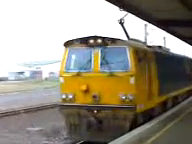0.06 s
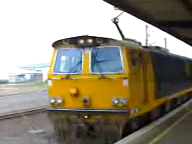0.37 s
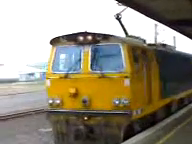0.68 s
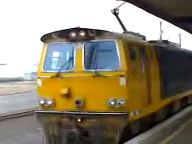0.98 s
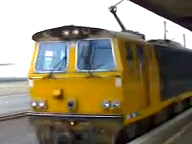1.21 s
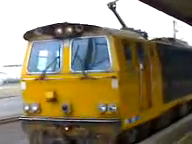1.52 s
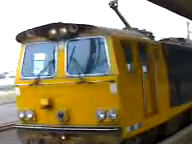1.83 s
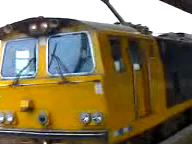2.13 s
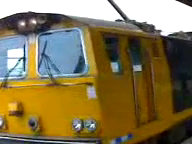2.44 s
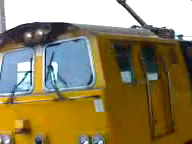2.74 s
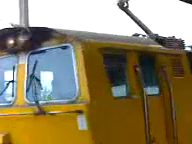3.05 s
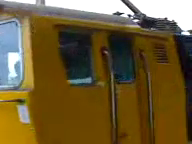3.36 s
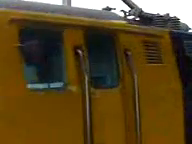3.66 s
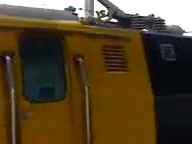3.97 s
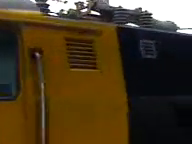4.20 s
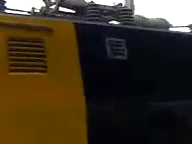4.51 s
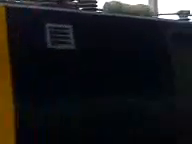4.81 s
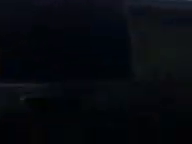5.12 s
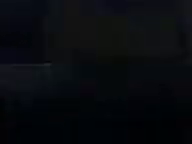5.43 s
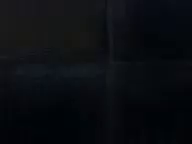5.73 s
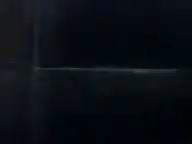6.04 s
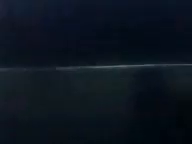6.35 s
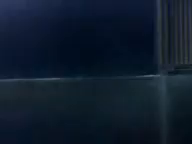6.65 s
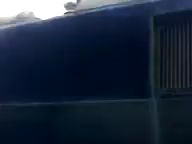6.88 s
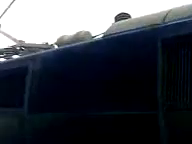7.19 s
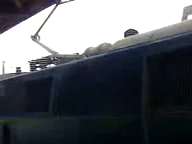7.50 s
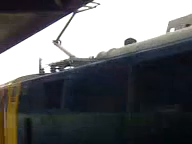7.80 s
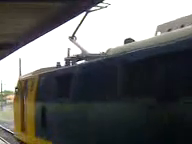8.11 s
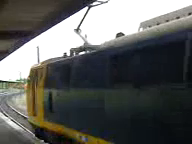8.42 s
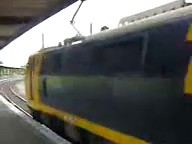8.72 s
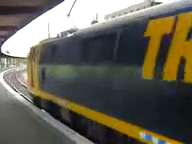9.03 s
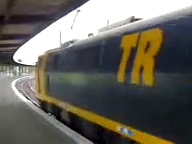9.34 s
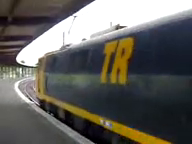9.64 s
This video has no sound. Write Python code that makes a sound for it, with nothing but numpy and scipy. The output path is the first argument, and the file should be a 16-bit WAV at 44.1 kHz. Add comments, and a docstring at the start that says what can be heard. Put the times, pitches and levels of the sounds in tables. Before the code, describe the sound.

The throbbing hum of an electric locomotive grows into a loud, slightly crackling roar as it rolls past, then eases away.

```python
"""A station platform: an electric locomotive pulls past at arm's length, slowly gathering speed.
Its blowers hum on multiples of their shaft speed and push air through ducts and louvres.
Gear teeth growl, the motor casing drones, wheels roll and rumble; near the end a flange squeaks.
A small narrow-band recorder overloads while the body is alongside."""
import sys
import numpy as np
from scipy import signal
from scipy.fft import rfft, irfft, next_fast_len
from scipy.io import wavfile

SR = 44100
rng = np.random.default_rng(int(sys.argv[2]) if len(sys.argv) > 2 else 0)


def put_to_file(sound):
    """Save the sound as 16-bit audio at rate SR, in the file named by the first command-line argument."""
    columns = np.atleast_2d(sound).T  # one column per channel
    safe = np.clip(columns, -1, 1)
    whole_steps = np.round(safe * 32767)
    wavfile.write(sys.argv[1], SR, whole_steps.astype(np.int16))


N = 430416
TIME_S = np.arange(N) / SR


def from_db(db):
    """Decibels to gain."""
    return np.exp(np.asarray(db) * np.log(10) / 20)


def unit_rms(x):
    """Scale to rms 1."""
    return x / np.sqrt(np.mean(x ** 2) + 1e-20)


def curves(rows):
    """Each column after time_s, interpolated per sample."""
    time_s, *columns = np.transpose(rows)
    return [np.interp(TIME_S, time_s, column) for column in columns]


def filtered(x, spectrum):
    """Filter by a gain curve interpolated over log frequency."""
    freq_hz, gain_db = np.transpose(spectrum)
    size = next_fast_len(N + SR // 10, real=True)
    bin_hz = np.maximum(np.arange(size // 2 + 1) * SR / size, 1)
    gain = from_db(np.interp(np.log(bin_hz), np.log(freq_hz), gain_db))
    return irfft(rfft(x, size) * gain, size)[:N]


def noise(spectrum):
    """Coloured noise, rms 1."""
    return unit_rms(filtered(rng.standard_normal(N), spectrum))


def drift(rate_hz):
    """Random wander, low-passed at rate_hz, rms 1."""
    hop = 40
    pole = np.exp(-2 * np.pi * rate_hz * hop / SR)
    white = rng.standard_normal(N // hop + 2002)
    slow = signal.lfilter([1], [1, -2 * pole, pole * pole], white)[2000:]
    return np.interp(np.arange(N) / hop, np.arange(len(slow)), unit_rms(slow))


def tone(pitch_hz, scatter, rate_hz):
    """Direct sine plus reflections wandering in strength and phase, rms 1."""
    phase = 2 * np.pi * (np.cumsum(pitch_hz) / SR + rng.random())
    in_phase = (1 + scatter * drift(rate_hz)) * np.cos(phase)
    quadrature = scatter * drift(rate_hz) * np.sin(phase)
    return unit_rms(in_phase + quadrature)


def nose_to_tail(nose_spectrum, tail_spectrum, start_s=5.67, end_s=8.17):
    """Noise crossfading from the nose's colour to the tail's at constant power."""
    angle = np.interp(TIME_S, (start_s, end_s), (0, np.pi / 2))
    return np.cos(angle) * noise(nose_spectrum) + np.sin(angle) * noise(tail_spectrum)


def flicker(x, depth_db, rate_hz, bands, spacing_hz=350):
    """Flicker of the recorder's speech codec: each band swells and sinks at random; rms 1."""
    size = next_fast_len(N, real=True)
    spectrum, bin_hz = rfft(x, size), np.arange(size // 2 + 1) * SR / size
    mix = 0
    for weights in np.eye(bands):
        band_gain = np.interp(bin_hz, spacing_hz * np.arange(bands), weights)
        band = irfft(spectrum * band_gain, size)[:N]
        mix += from_db(depth_db * drift(rate_hz)) * band
    return unit_rms(mix)


def pass_by(close_db, front_s, rear_s, distance_s):
    """Gain of a long radiator: power follows the angle it fills. Distance is in travel time."""
    angle = np.arctan2(TIME_S - front_s, distance_s) - np.arctan2(TIME_S - rear_s, distance_s)
    return from_db(close_db) * np.sqrt(np.abs(angle) / np.pi)


def platform_reflection(swell_s, initial_rate_hz, reflection_db):
    """Gain of a tone as its reflection slides in and out of phase, quicker as speed builds; rms 1."""
    speedup_per_s = 0.035
    cycles = initial_rate_hz * (TIME_S - swell_s + speedup_per_s * TIME_S ** 2 / 2)
    return unit_rms(np.abs(1 + from_db(reflection_db) * np.exp(2j * np.pi * cycles)))


# Shaft speed as heard, lowered slightly by the passing: time_s, shaft_hz
SHAFT_SPEED = [(0, 24.6), (4.3, 24.55), (6, 24.37), (9.76, 24.29)]
# Shaft harmonics: order, approaching_db, alongside_db, leaving_db
SHAFT_HARMONICS = [(9, -39.5, -25.5, -33), (10, -42, -25.5, -31), (11, -35, -24, -36.5),
                   (12, -37, -26, -31), (13, -40.5, -34, -38), (15, -41.5, -28, -41.5),
                   (17, -37, -35.5, -38), (20, -35, -27.5, -35.5), (21, -34.5, -29.5, -36),
                   (29, -41, -40, -46.5), (36, -42, -35.5, -50.5)]
# Start and end of those three stages: time_s
STAGE_EDGES_S = (0, 1.3, 4.7, 5.9, 7.4, 9.76)
# Blade tones and their reflections: order, swell_s, initial_rate_hz, reflection_db
BLADE_TONES = [(18, 0.46, 0.846, -7), (19, 0.19, 1.279, -6)]
# Blade tone levels as the intakes pass: time_s, level_db
LOWER_BLADE_LEVEL = [(0, -30.5), (1.5, -28.5), (2.2, -34.5), (3.2, -28.5), (3.95, -21.5), (4.35, -27),
                     (5.6, -27.5), (6.7, -23.5), (7.4, -33), (7.85, -23), (8.8, -30.5), (9.76, -32.5)]
UPPER_BLADE_LEVEL = [(0, -29.5), (1.1, -30), (1.9, -37), (2.15, -19.5), (2.75, -25.5), (3.2, -21.5),
                     (3.6, -23.5), (4.15, -24.5), (4.7, -30), (5.4, -29), (5.9, -19.5), (6.6, -24.5),
                     (7.7, -31), (8.3, -26), (9.76, -36.5)]

def blowers():
    """Two strong blade tones throb against weaker shaft harmonics."""
    shaft_hz, = curves(SHAFT_SPEED)
    hum = 0
    for order, *stage_db in SHAFT_HARMONICS:
        level_db = np.interp(TIME_S, STAGE_EDGES_S, np.repeat(stage_db, 2))
        hum += from_db(level_db) * tone(order * shaft_hz, scatter=0.44, rate_hz=1.54)
    for (order, *reflection), levels in zip(BLADE_TONES, (LOWER_BLADE_LEVEL, UPPER_BLADE_LEVEL)):
        blade_db, = curves(levels)
        gain = from_db(blade_db) * platform_reflection(*reflection)
        hum += gain * tone(order * shaft_hz, scatter=0.17, rate_hz=4.7)
    return hum


# Casing drone: time_s, pitch_hz, relative_db
CASING_DRONE = [(0, 380, -35.5), (2.4, 378, -39), (3.2, 374, -25), (4.5, 385, -35), (6.3, 381, -21),
                (7.1, 395, -22.5), (7.55, 389, -17), (8.15, 394, -19.5), (8.5, 390, -29),
                (9.76, 395, -42.5)]

def motor_casing():
    """The casing drones at a nearly fixed pitch."""
    pitch_hz, relative_db = curves(CASING_DRONE)
    return from_db(relative_db - 0.5) * tone(pitch_hz, scatter=1.0, rate_hz=9.0)


# Duct air spectra: freq_hz, relative_db
DUCT_NOSE = [(140, -32), (163, -13.5), (180, -1), (198, -1), (215, -4), (265, 1.5), (325, -1.5), (380, 1.5),
             (415, 0), (445, -3), (520, -12.5), (650, -26.5), (1000, -42.5)]
DUCT_TAIL = [(140, -29.5), (170, -10), (200, 1), (240, 3.5), (300, -1), (340, -0.5), (400, -1), (440, -10),
             (520, -7.5), (650, -16.5), (1000, -48)]
# Two ducts passing: close_db, front_s, rear_s, distance_s
DUCT_PASSES = [(-15.2, 3.45, 6.85, 0.68), (-17.7, 7.5, 9.55, 0.7)]

def duct_roar(gust_db=1.15):
    """Cooling air roars unevenly through two ducts; their powers add."""
    gain = np.sqrt(sum(pass_by(*duct) ** 2 for duct in DUCT_PASSES))
    gusts = from_db(gust_db * drift(rate_hz=2))
    return gain * gusts * nose_to_tail(DUCT_NOSE, DUCT_TAIL)


# Rolling noise spectra: freq_hz, relative_db
ROLLING_NOSE = [(250, -26.5), (480, -4), (600, -0.5), (730, -1), (820, 2), (900, -2), (985, -2), (1060, -5),
                (1500, -13), (2500, -26)]
ROLLING_TAIL = [(200, -16), (480, 2), (600, 4.5), (730, 1), (830, 1.5), (920, -5), (1020, -1.5),
                (1150, -3.5), (1500, -14), (2500, -39)]

def wheel_roll():
    """Wheels on rails make a midrange roar; the recorder makes it flicker band by band."""
    rolling = flicker(nose_to_tail(ROLLING_NOSE, ROLLING_TAIL), depth_db=1.86, rate_hz=25.0, bands=6)
    return pass_by(close_db=-11.65, front_s=5.3, rear_s=8.25, distance_s=1.95) * rolling


# Louvre air spectra: freq_hz, relative_db
LOUVRE_NOSE = [(600, -16), (1200, -1), (1500, 1.5), (1690, 2.5), (2020, 0), (2290, 2.5), (2550, 1),
               (2900, -1.5), (3200, -1.5), (3500, -5), (4500, -4.5)]
LOUVRE_TAIL = [(600, -21), (1200, 0.5), (1600, 4), (2000, 0), (2350, 1.5), (2600, 3), (2950, 1.5),
               (3200, 2.5), (4500, -5)]

def louvre_hiss(flutter_db=0.22):
    """Cooling air hisses through the louvres; the recorder makes the treble flicker band by band."""
    flutter = from_db(flutter_db * drift(rate_hz=60))
    hiss = flicker(nose_to_tail(LOUVRE_NOSE, LOUVRE_TAIL), depth_db=2.5, rate_hz=28.7, bands=11)
    return pass_by(close_db=-12.0, front_s=4.4, rear_s=7.75, distance_s=1.53) * flutter * hiss


# Rumble spectra: freq_hz, relative_db
RUMBLE_NOSE = [(12, -44.5), (28, -26), (42, -11), (62, -2.5), (100, 0), (150, 2), (220, -6.5), (400, -29.5)]
RUMBLE_TAIL = [(12, -45.5), (28, -30), (42, -20), (62, -5), (100, 0.5), (150, 2.5), (220, -4.5), (400, -35)]

def rumble():
    """Low noise swells as the body passes."""
    gain = pass_by(close_db=-27.5, front_s=4.5, rear_s=8, distance_s=1.5)
    return gain * nose_to_tail(RUMBLE_NOSE, RUMBLE_TAIL)


# Gear mesh fundamental: time_s, pitch_hz, level_db
GEAR_MESH = [(0, 170, -50), (2.6, 192, -32), (4.2, 228, -33.5), (5.5, 260, -18.5), (6.7, 280, -28),
             (7.4, 292, -23.5), (8.0, 303, -23), (8.7, 312, -31.5), (9.2, 323, -24), (9.76, 325, -37.5)]

def gears():
    """Meshing teeth growl, rising in pitch with speed."""
    mesh_hz, level_db = curves(GEAR_MESH)
    fundamental = tone(mesh_hz, scatter=0.9, rate_hz=7.0)
    octave = from_db(-10) * tone(2 * mesh_hz, scatter=3.0, rate_hz=18.0)
    return from_db(level_db) * (fundamental + octave)


def burst(start_s, attack_s, hold_s, t60_s, level_db):
    """Envelope: linear attack, hold, exponential release."""
    age_s = TIME_S - start_s
    attack = np.clip(age_s / attack_s, 0, 1)
    released = np.clip((age_s - attack_s - hold_s) / t60_s, 0, 10)
    return attack * from_db(level_db - 60 * released)


def flange_squeak():
    """A flange scrapes the curved rail; its wheel rings, climbing in pitch while pressed."""
    ring_start_s, attack_s, hold_s = 9.452, 0.015, 0.035
    ring_hz, rise_hz_per_s = 3140, 1900
    scrape = noise([(700, -13), (1200, -8), (2200, 3.5), (3200, -1), (4500, -5.0)])
    scrape *= burst(start_s=9.42, attack_s=0.012, hold_s=0.03, t60_s=0.16, level_db=-15.0)
    pressed_s = np.clip(TIME_S - ring_start_s, 0, attack_s + hold_s)
    ring = tone(ring_hz + rise_hz_per_s * pressed_s, scatter=0.55, rate_hz=60.0)
    ring *= burst(ring_start_s, attack_s, hold_s, t60_s=0.06, level_db=-21.5)
    return scrape + ring


def scene():
    """Mono sum at one microphone on the platform."""
    machinery = blowers() + motor_casing() + gears()
    roar = duct_roar() + wheel_roll() + louvre_hiss() + rumble()
    return (machinery + roar + flange_squeak())[None]


# Recorder response: freq_hz, gain_db
RECORDER_RESPONSE = [(10, -2), (3200, 2), (3400, -1.5), (3600, -9), (3900, -14.5), (4200, -24),
                     (4450, -38.5), (4700, -77), (6000, -100)]

def record(dry):
    """The recorder rolls off above 3.4 kHz, then clips; peaks crackle above that band."""
    clip_level, knee_sharpness, cutoff_hz = 0.72, 60.0, 15900
    narrow = filtered(dry[0], RECORDER_RESPONSE)
    clipped = narrow / (1 + np.abs(narrow / clip_level) ** knee_sharpness) ** (1 / knee_sharpness)
    lowpass = signal.ellip(10, 0.05, 60, cutoff_hz, fs=SR, output="sos")
    return signal.sosfiltfilt(lowpass, clipped)[None]


dry = scene()
out = record(dry)
put_to_file(out)
```